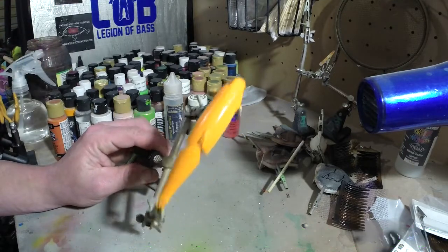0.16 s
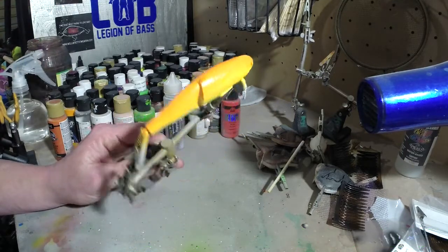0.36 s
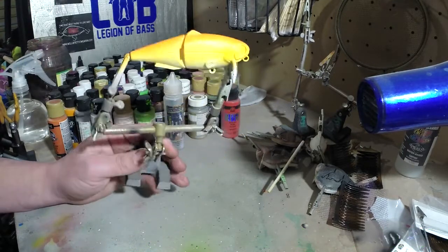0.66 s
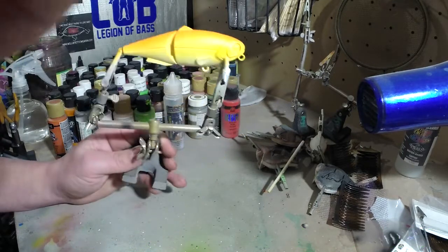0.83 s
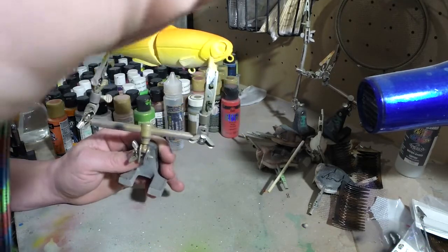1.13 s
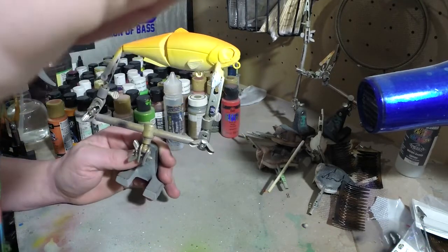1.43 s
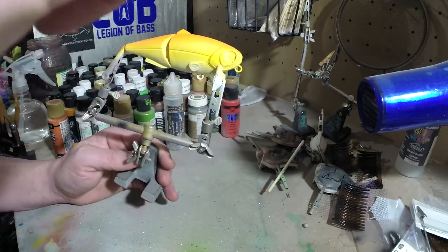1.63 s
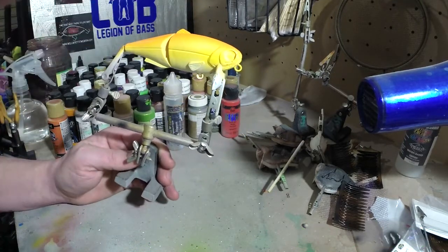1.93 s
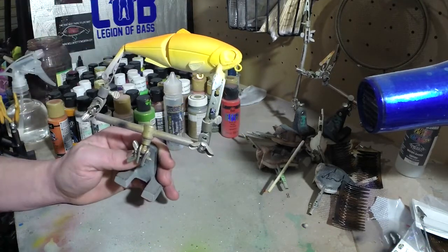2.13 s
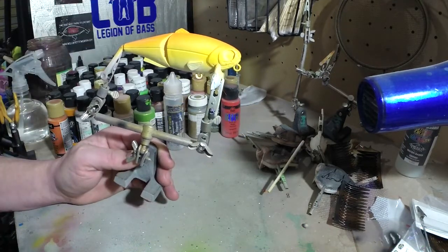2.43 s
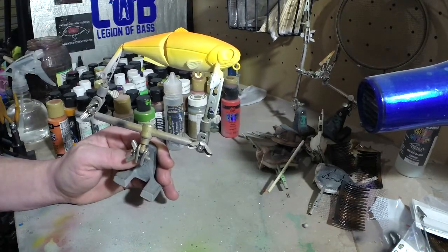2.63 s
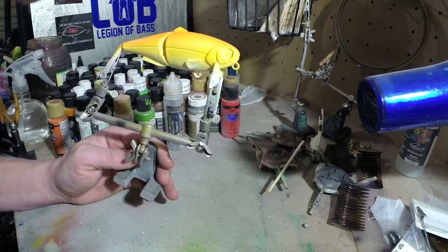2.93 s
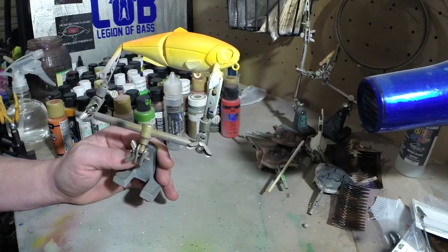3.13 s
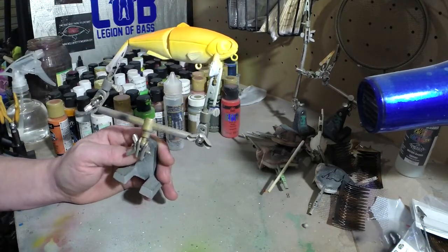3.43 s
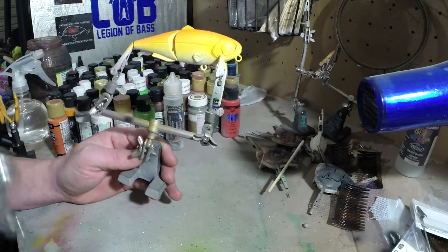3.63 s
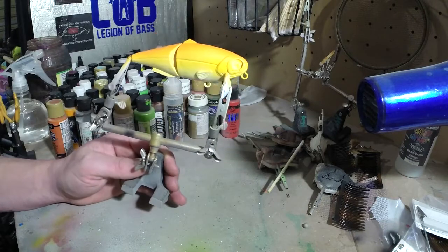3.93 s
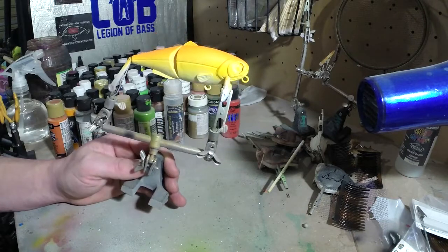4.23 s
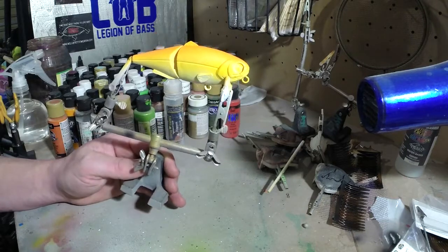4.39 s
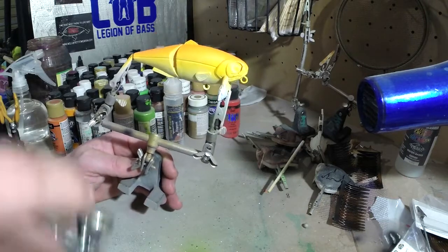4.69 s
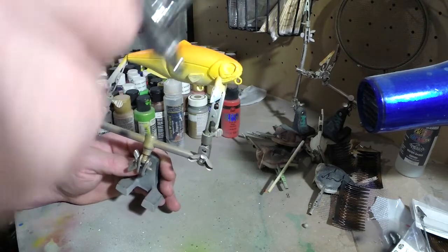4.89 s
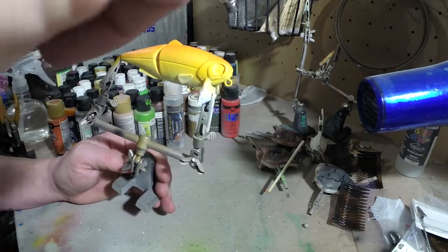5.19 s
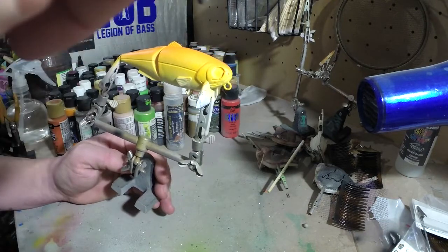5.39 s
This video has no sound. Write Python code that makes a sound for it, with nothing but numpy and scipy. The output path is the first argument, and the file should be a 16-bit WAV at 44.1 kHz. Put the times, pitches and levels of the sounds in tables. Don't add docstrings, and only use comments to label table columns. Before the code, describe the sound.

Mono camera sound of airbrush painting in a small room with a quiet steady fan. A tiny hiss clicks off, small steel joints tick in a cluster, then a bright, rapidly pulsing spray runs for almost two seconds. It snaps off; a softer airy burst follows with firm skin rubs, then a short gap and one more hiss with a brief surge.

```python
import sys
import numpy as np
from scipy import signal
from scipy.fft import rfft, irfft, next_fast_len
from scipy.io import wavfile
from scipy.ndimage import uniform_filter1d, map_coordinates

SR = 44100
rng = np.random.default_rng(int(sys.argv[2]) if len(sys.argv) > 2 else 0)


def transcribe(u):
    v = np.clip(np.atleast_2d(u).T, -1, 1)
    q = np.round(v * 32767).astype(np.int16)
    wavfile.write(sys.argv[1], SR, q)


def ratio(d):
    e = np.asarray(d, float) / 20
    return 10 ** e


N = 244755


def unit(x):
    return x / np.sqrt(np.mean(x ** 2) + 1e-20)


def along(points, hz):
    f, v = np.transpose(points)
    return np.interp(np.log(hz + 1), np.log(f + 1), v)


def colour(points):
    return lambda hz: ratio(along(points, hz))


def wobble(rate):
    knots = rng.standard_normal(int(N * rate / SR) + 4)
    return map_coordinates(knots, [np.arange(N) * rate / SR])


def held(start, length, rise, fall):
    t = np.arange(N) / SR
    return np.clip(np.minimum((t - start) / rise, (start + length - t) / fall), 0, 1)


def filtered(x, response):
    m = next_fast_len(N + SR // 2)
    return irfft(rfft(x, m) * response(np.fft.rfftfreq(m, 1 / SR)), m)[..., :N]


def modes(table):
    def response(f):
        total = 0
        for k, (centre, width, db) in enumerate(table):
            band = 1j * f * width
            total = total + (-1) ** k * ratio(db) * band / (centre * centre - f * f + band)
        return total
    return response


def rush(gain, patchy_db):
    z = signal.stft(rng.standard_normal(N), nperseg=512)[2]
    field = uniform_filter1d(rng.standard_normal(z.shape), size=5, axis=0)
    field = uniform_filter1d(field, size=10, axis=1)
    noise = signal.istft(z * ratio(patchy_db * unit(field)), nperseg=512)[1][:N]
    return unit(filtered(noise, gain))


# (frequency [Hz], density [dB/Hz])
FAN_SPECTRUM = [(12, -47.5), (25, -5.5), (50, 1), (120, -4.5), (250, -11), (500, -16.5), (1000, -20.5),
                (2600, -25), (4500, -32.5), (8000, -39), (13000, -48.5), (15300, -50)]


def fan():
    drift_db = 0.5 * wobble(5)
    return ratio(-52 + drift_db) * rush(colour(FAN_SPECTRUM), patchy_db=0.92)


# (frequency [Hz], t60 [s])
ROOM_DECAY = [(500, 0.83), (4000, 0.17), (14000, 0.226)]


def room(x):
    hz, t, z = signal.stft(rng.standard_normal(SR // 2), SR, nperseg=256)
    decay = ratio(-60 * t / along(ROOM_DECAY, hz)[:, None])
    tail = signal.istft(z * decay, SR, nperseg=256)[1]
    return signal.fftconvolve(x, tail / np.linalg.norm(tail))[:N]


# (time [s], peak level [dB], centre [Hz], sharpness Q [1])
CLAMP_TICKS = [(0.1142, -45, 3000, 2.5), (.14, -52.5, 3200, 1), (0.4907, -46, 3050, 4.1),
               (.589, -41.5, 5000, 4.9), (0.6975, -43.5, 5120, 2.75), (0.7339, -33.5, 3700, 0.85),
               (0.7635, -41, 4200, 1.18), (0.7721, -42, 4850, 0.82), (0.783, -30, 5490, 2.5),
               (0.793, -36, 5100, 0.83), (0.809, -43, 3430, 0.64), (0.883, -44, 3085, 7.2),
               (0.8957, -29, 6420, 11), (.8961, -39.5, 11500, 1.5), (.7832, -57, 11500, 4),
               (.9462, -51, 6000, 2.2), (1.0044, -40, 4500, 1.3), (1.01, -44.5, 4430, 1.3),
               (1.024, -52.5, 5950, 2.5), (1.0323, -46, 6930, 2.4), (1.8221, -32, 1200, 0.35)]


def clamp_ticks():
    out, t = np.zeros(N), np.arange(SR // 50) / SR
    for s, peak_db, hz, q in CLAMP_TICKS:
        burst = ratio(-60 * t / 0.0035) * rng.standard_normal(len(t))
        crack = signal.lfilter(*signal.iirpeak(hz, q, SR), burst)
        crack = signal.lfilter(*signal.butter(2, min(1.4 * hz, 15000), fs=SR), crack)
        out[round(s * SR):][:len(t)] += ratio(peak_db) * crack / np.abs(crack).max()
    return out


# (time [s], length [s], level [dB])
CLAMP_TURNS = [
    (.74, 0.0734, -65),
    (1.02, .03, -67),
]
# (frequency [Hz], density [dB/Hz])
RUB_SPECTRUM = [(1200, -26.5), (2500, 8), (5000, 0), (9000, -17.5), (15000, -14)]


def clamp_squeak():
    squeak_hz, fade_s = 6920, 0.034
    squeak = rush(lambda f: 1 / (1 + ((f - squeak_hz) / 200) ** 2), patchy_db=1)
    rub = ratio(3 + 4.5 * wobble(150)) * rush(colour(RUB_SPECTRUM), patchy_db=3.5)
    level = np.zeros(N)
    for s, length, db in CLAMP_TURNS:
        level += ratio(db) * held(s - fade_s, length + 2 * fade_s, fade_s, fade_s) ** 2
    return level * (squeak + rub)


# (time [s], level [dB], rise [s], fall [s], brightness 0-1 [1])
FINGER_STROKES = [
    (.145, -57.5, 0.0355, .02, 0.5),
    (.5, -61, 0.021, .02, 0.2),
    (4.245, -39.5, .05, 0.059, 0.17),
    (4.437, -34, .022, 0.035, 0.97),
    (4.482, -34, 0.041, 0.0236, 0.98),
]
# (centre [Hz], width [Hz], level [dB])
FLAT_HAND = [(550, 300, -8), (1100, 300, -3), (1750, 450, 3), (2350, 400, 3), (3000, 400, -5),
             (3800, 600, -7), (4600, 700, -8)]
# (centre [Hz], width [Hz], level [dB])
CUPPED_HAND = [(1736, 220, 1.5), (2600, 166, -3.5), (3050, 232, 3), (4620, 700, 0.5), (5760, 310, -0.5),
               (7600, 1700, -9.5)]


def scuff():
    t, hollow = np.arange(N) / SR, modes(CUPPED_HAND)
    dull = rush(modes(FLAT_HAND), patchy_db=2.5)
    sharp = rush(lambda f: hollow(f) / (1 + (1900 / (f + 1)) ** 4), patchy_db=1.0)
    dull_power, sharp_power = np.zeros(N), np.zeros(N)
    for s, db, rise, fall, bright in FINGER_STROKES:
        distance = np.abs((t - s) / np.where(t < s, rise, fall))
        power = ratio(db - 20 * distance ** 1.7) ** 2
        dull_power += (1 - bright) * power
        sharp_power += bright * power
    roughness = ratio(0.56 * wobble(230))
    return roughness * (np.sqrt(dull_power) * dull + np.sqrt(sharp_power) * sharp)


# (time [s], level [dB], t60 [s])
VALVE_SNAPS = [
    (0.0571, -30.5, 0.026),
    (3.2744, -40, 0.01),
    (3.283, -31, 0.0202),
    (3.9025, -36, .018),
    (4.6057, -37, 0.02),
]
# (centre [Hz], width [Hz], level [dB])
VALVE_BODY = [(1890, 730, -11), (4200, 890, -0.5), (5750, 617, 2.5), (6700, 740, -5), (8660, 910, -4),
              (14500, 1300, -7)]


def valve():
    out, t = np.zeros(N), np.arange(SR // 8) / SR
    for s, db, t60 in VALVE_SNAPS:
        for late_s, gain_db in ((0, 10), (0.0045, 1)):
            burst = ratio(db + gain_db - 60 * t / t60) * rng.standard_normal(len(t))
            out[round((s + late_s) * SR):][:len(t)] += burst
    return filtered(out, modes(VALVE_BODY))


# (time [s], air flow [dB])
TRIGGER_BURSTS = [
    [(0.0, -38.5), (0.018, -34), (0.026, -40)],
    [(1.3, -86), (1.41, -49.5), (1.45, -44), (1.462, -37), (2.1, -40.5), (2.9, -38.5), (3.2, -41.5),
     (3.25, -36.5), (3.258, -40.5)],
    [(3.72, -82), (3.756, -50), (3.897, -51), (3.905, -46), (3.96, -45.5), (4.25, -48.5), (4.55, -47),
     (4.571, -37.5), (4.582, -41.5)],
    [(4.945, -73), (5.028, -58.5), (5.045, -45.5), (5.2, -46.5), (5.212, -39), (5.235, -36), (5.278, -39),
     (5.288, -43), (5.55, -43.5)],
]


def trigger():
    t, shut_s, shut_db = np.arange(N) / SR, 0.013, -120
    flow_db = np.full(N, float(shut_db))
    for burst in TRIGGER_BURSTS:
        opening, closed = (burst[0][0] - shut_s, shut_db), (burst[-1][0] + shut_s, shut_db)
        s, db = np.transpose([opening, *burst, closed])
        flow_db = np.maximum(flow_db, np.interp(t, s, db))
    return flow_db


# (time [s], length [s], flutter depth [dB], first drop rate [Hz], settled drop rate [Hz])
PAINT_SPURTS = [
    (0, .03, -1, 108, 110),
    (1.468, 1.76, 11, 146.6, 88.5),
    (3.9, .09, 4.5, 59.6, 60),
    (5.207, 0.125, 11, 88.8, 60),
]


def paint():
    t, settle_s, wet_s, dry_s = np.arange(N) / SR, 0.27, 0.075, 0.116
    rate, depth_db = np.zeros(N), np.full(N, 2.5)
    for s, length, db, first_hz, settled_hz in PAINT_SPURTS:
        settling = settled_hz + (first_hz - settled_hz) * np.exp(-np.abs(t - s) / settle_s)
        rate = np.where(t >= s, settling, rate)
        wetness = held(s, length, min(wet_s, length / 3), min(dry_s, length / 3))
        depth_db = np.maximum(depth_db, db * wetness)
    return rate, depth_db


def flutter():
    rate, depth_db = paint()
    turns = np.cumsum(rate * (1 + 0.0274 * wobble(40))) / SR + 0.3
    size = 1 + 0.15 * rng.standard_normal(1000)[turns.astype(int)]
    swell = uniform_filter1d((turns % 1) ** 2, size=50) - 0.36
    return ratio(depth_db * size * swell + 0.26 * wobble(30) + 0.31 * wobble(300))


# (frequency [Hz], density [dB/Hz])
AIR_HISS = [(410, -11.5), (700, -16.5), (967, -32.5), (1690, -16), (2020, -17), (6070, -5), (10700, -0.5),
            (14200, 4.5), (15400, 1.5)]
# (frequency [Hz], density [dB/Hz])
AIR_HISS_ASIDE = [(410, -41), (700, -20), (2500, -13), (3300, -6), (6000, -5.5), (9000, -3), (11500, -0.5),
                  (15300, -2)]
# (frequency [Hz], density [dB/Hz])
WET_BODY = [(700, -34), (1600, -35), (2400, -31), (3400, -10), (3850, -6), (5200, -3.5), (6200, 2),
            (8000, -5), (10000, -31), (13000, -5.5)]
# (frequency [Hz], density [dB/Hz])
WORK_WASH = [(150, 8), (300, -3), (700, -1), (1300, -4), (2400, 0.5), (3150, 2.5), (3600, 1), (5000, 1),
             (7000, -21.5)]


def jet():
    t, flow_db, full_db = np.arange(N) / SR, trigger(), -39
    aside = (t > 3.5) & (t < 4.75)
    hiss = rush(colour(AIR_HISS), patchy_db=1.0)
    hiss_aside = ratio(0.2) * rush(colour(AIR_HISS_ASIDE), patchy_db=1.0)
    hiss = np.where(aside, hiss_aside, hiss)
    body = rush(colour(WET_BODY), patchy_db=-2.0)
    wash = rush(lambda hz: ratio(along(WORK_WASH, hz) - 60 * (hz < 90)), patchy_db=2.5)
    body_db = -7 + 0.22 * np.clip(full_db - flow_db, -5, 30) - 4.5 * aside
    wash_db = -19 + 0.98 * np.clip(full_db - flow_db, -5, 9) + 2.5 * aside
    pulse = flutter()
    spray = pulse * (hiss + ratio(body_db) * body)
    return ratio(flow_db + 3) * (spray + np.sqrt(pulse) * ratio(wash_db) * wash)


def scene():
    near = jet() + scuff() + valve() + clamp_ticks() + clamp_squeak()
    return np.tile(near + ratio(-11) * room(near) + fan(), (2, 1))


# (time [s], length [s], how far the step follows the spectrum 0-1 [1], spared
# below [Hz], all lost from there up to [Hz])
THIN_MOMENTS = [(0.308, .012, 0.8, 4000, 200), (0.501, .03, 0.74, 3500, 200), (0.626, 0.012, .8, 3000, 200),
                (0.814, .012, 0.3, 7000, 200), (2.331, .016, 0.78, 220, 200), (2.862, .015, 0.76, 220, 200),
                (3.293, 0.011, 1, 220, 1700), (3.503, .012, 0.55, 3800, 200), (3.547, .012, 0.6, 2200, 200),
                (3.667, .03, 0.9, 2700, 200), (4.251, .014, 0.87, 220, 910), (4.361, .016, 0.54, 700, 200),
                (4.933, .012, 0.3, 5500, 200), (5.231, .016, .95, 300, 200),
                (5.447, 0.056, 0.83, 220, 2800)]


def thin_out(x):
    hz, t, z = signal.stft(x, SR, nperseg=1024, noverlap=768)
    for s, length, follow, spared_hz, lost_hz in THIN_MOMENTS:
        frames = np.abs(t - s) <= length / 2
        size = np.sqrt(np.mean(np.abs(z[:, frames]) ** 2, axis=1)) + 1e-12
        trend = uniform_filter1d(size, size=40)
        step = ratio(2.5) * trend ** follow * np.percentile(trend, 70) ** (1 - follow)
        kept = ratio(5.5) / (1 + (step / size) ** 24) * (hz > lost_hz)
        z[:, frames] *= np.where(hz < spared_hz, 1, kept)[:, None]
    faint_hz, f = 12700, hz[:, None]
    size = uniform_filter1d(uniform_filter1d(np.abs(z), size=3, axis=0), size=5, axis=1)
    floor = ratio(-112.5 + (f - faint_hz) * 0.001)
    z *= np.where(f > faint_hz, 1 / (1 + (floor / (size + 1e-12)) ** 12), 1)
    return signal.istft(z, SR, nperseg=1024, noverlap=768)[1][:N]


def band_limit(x):
    return signal.sosfilt(signal.butter(12, 16510, fs=SR, output="sos"), x)


def record(dry):
    top_hz = 15280
    mono = filtered(thin_out(dry[0]), lambda hz: ratio(-0.6 * np.maximum(hz - top_hz, 0)))
    return band_limit(np.tile(mono, (2, 1)))


dry = scene()
out = record(dry)
transcribe(out)
```